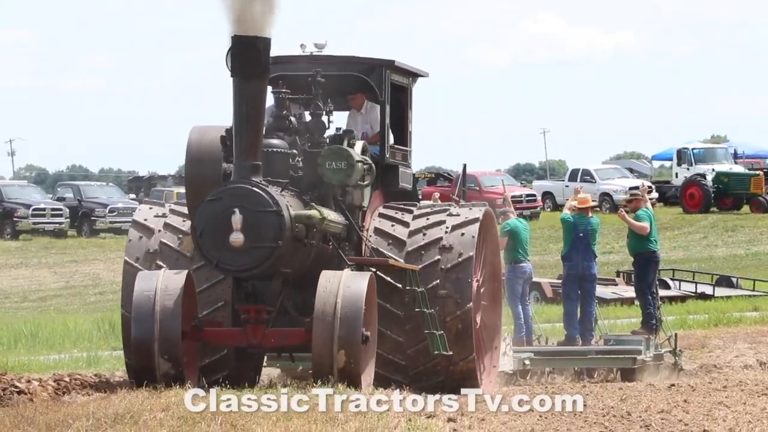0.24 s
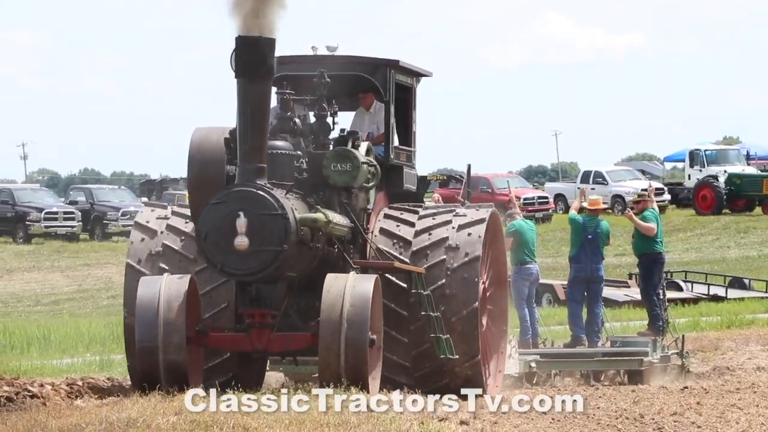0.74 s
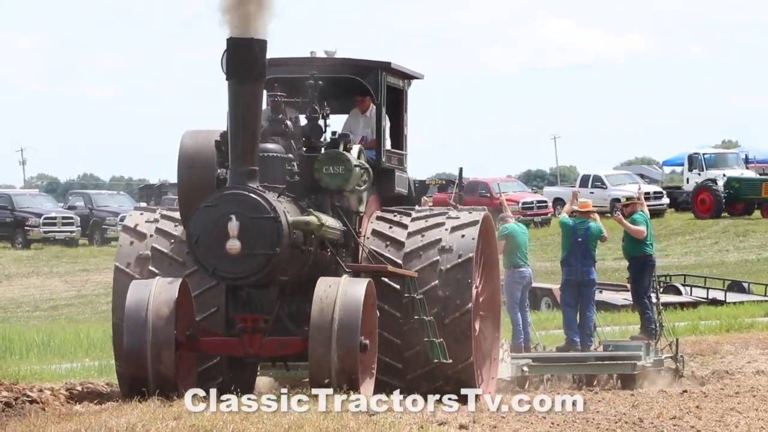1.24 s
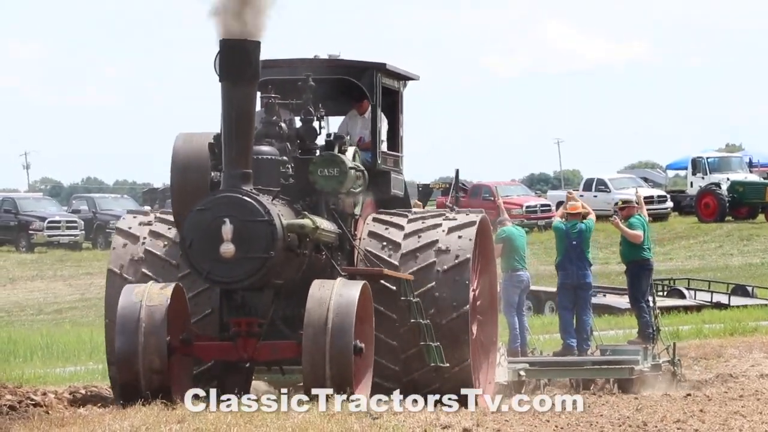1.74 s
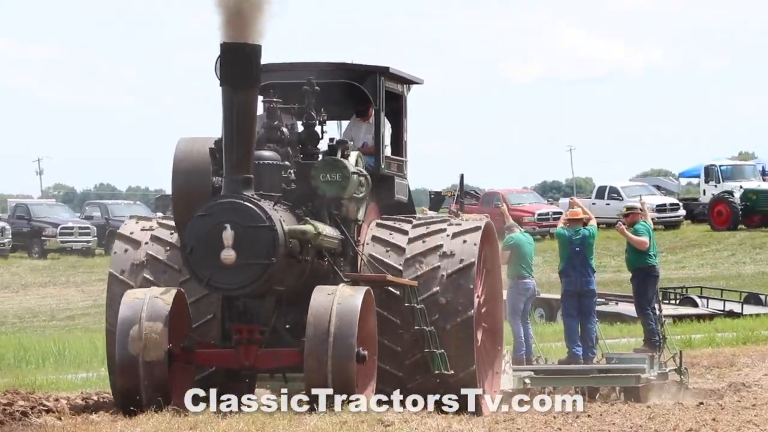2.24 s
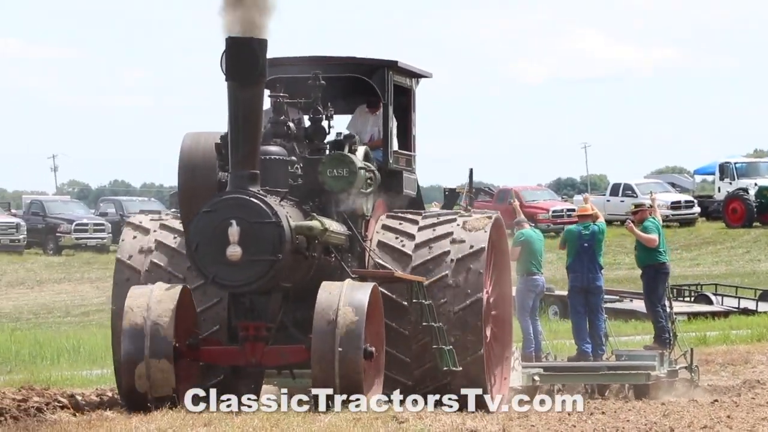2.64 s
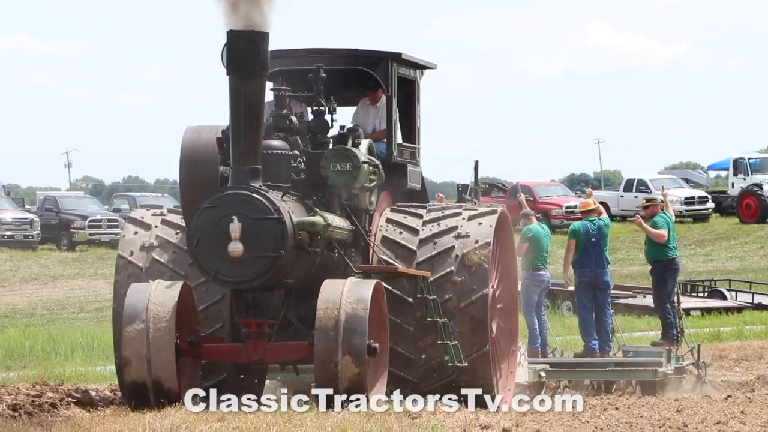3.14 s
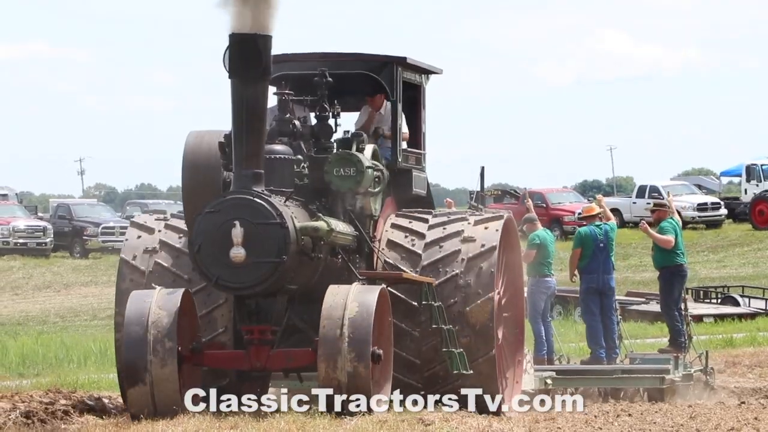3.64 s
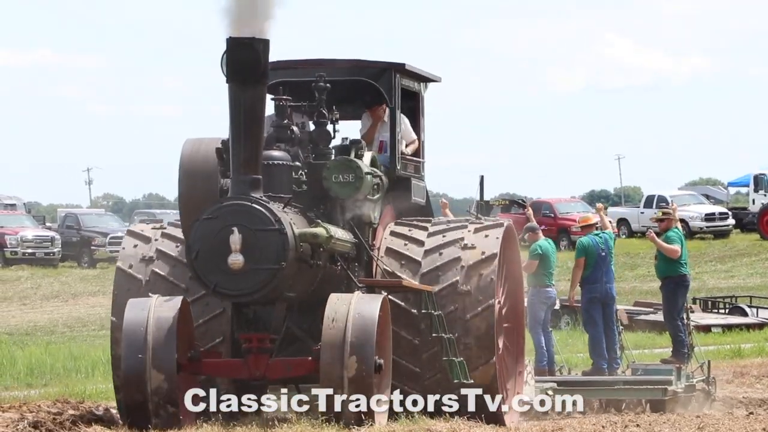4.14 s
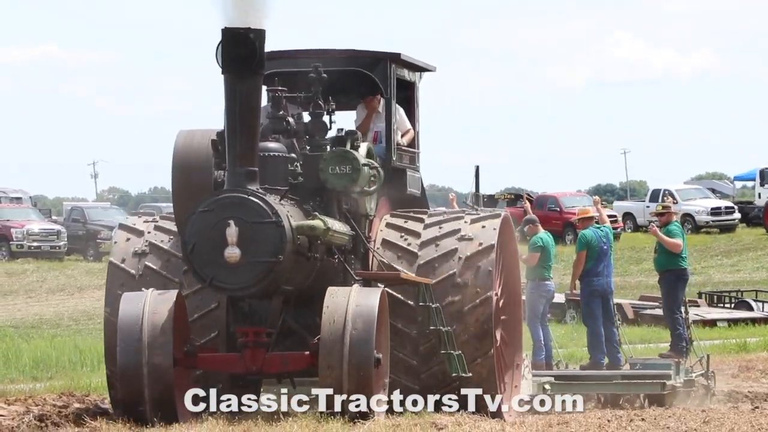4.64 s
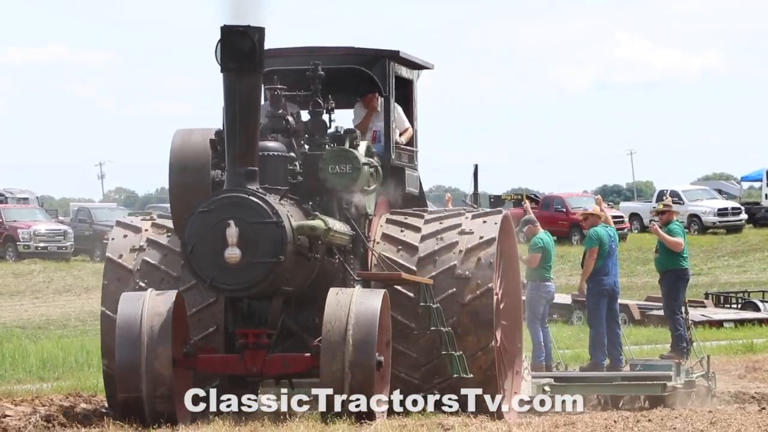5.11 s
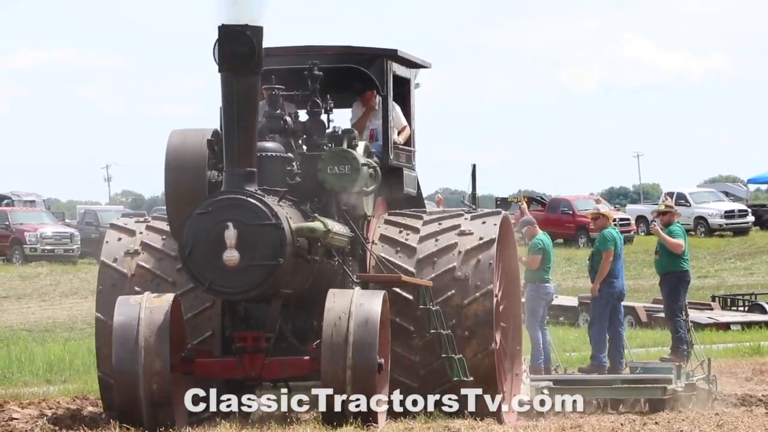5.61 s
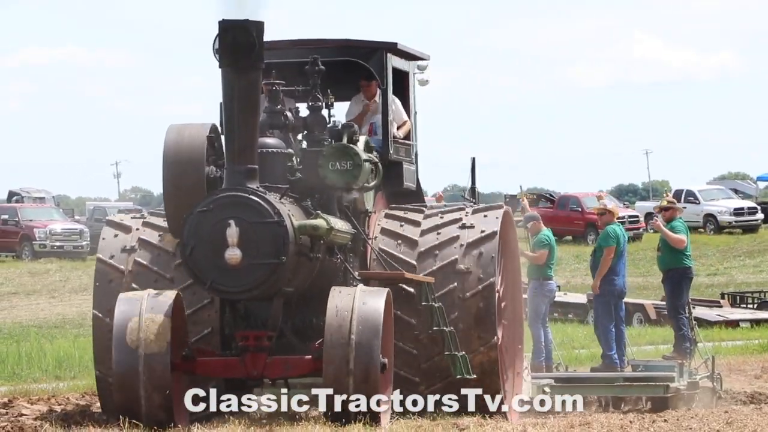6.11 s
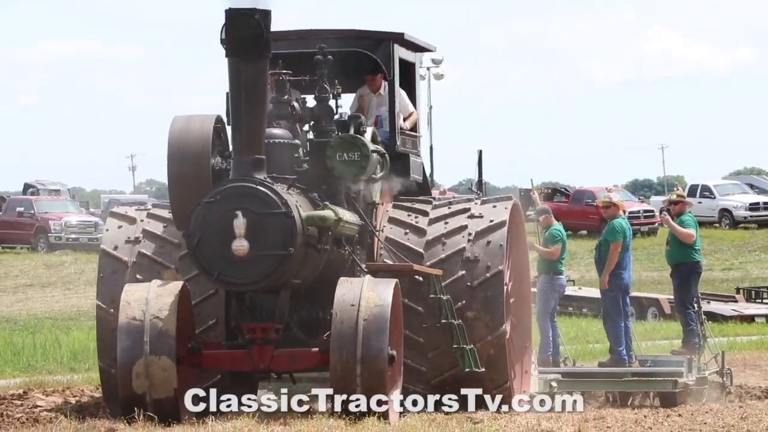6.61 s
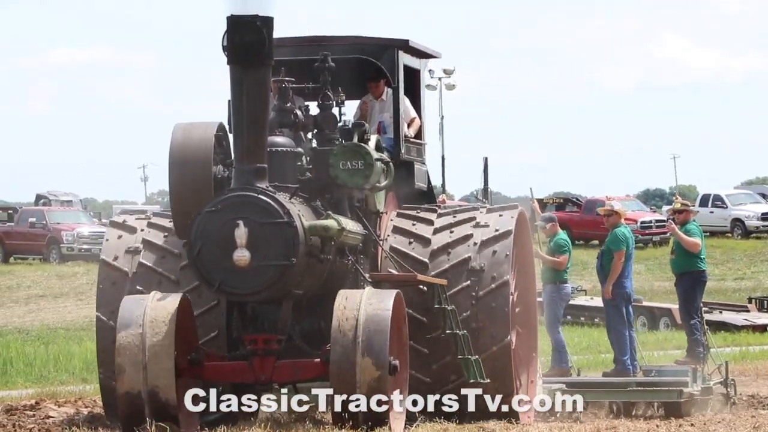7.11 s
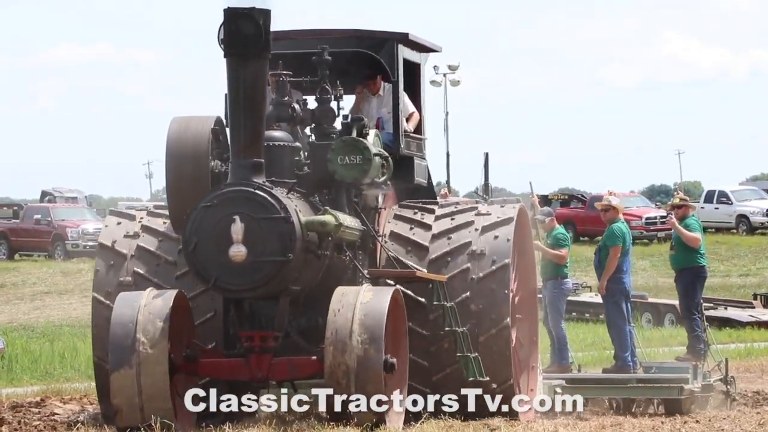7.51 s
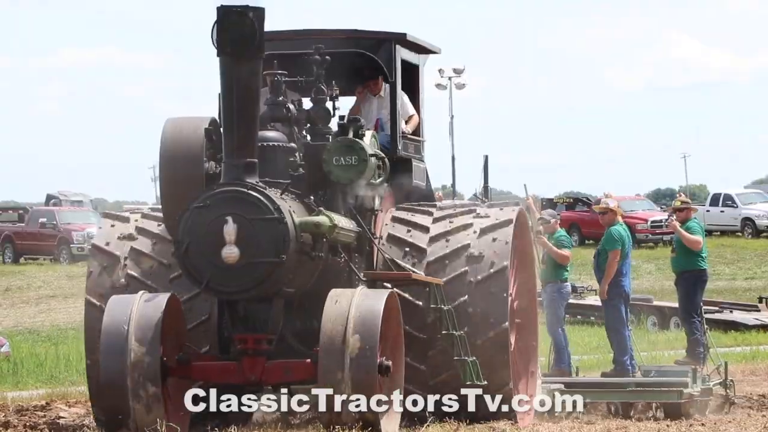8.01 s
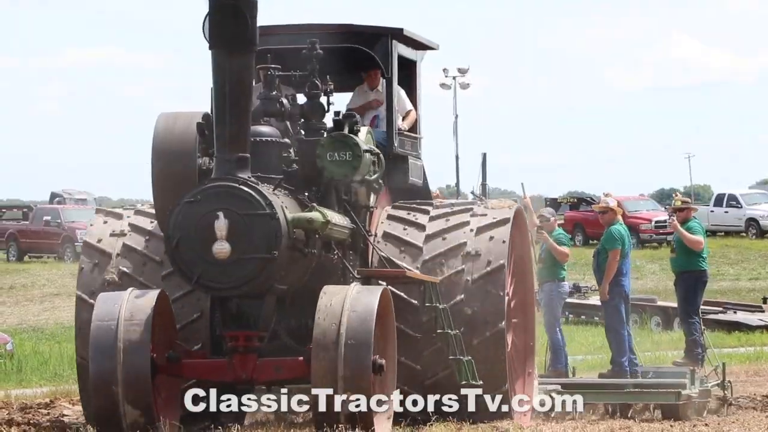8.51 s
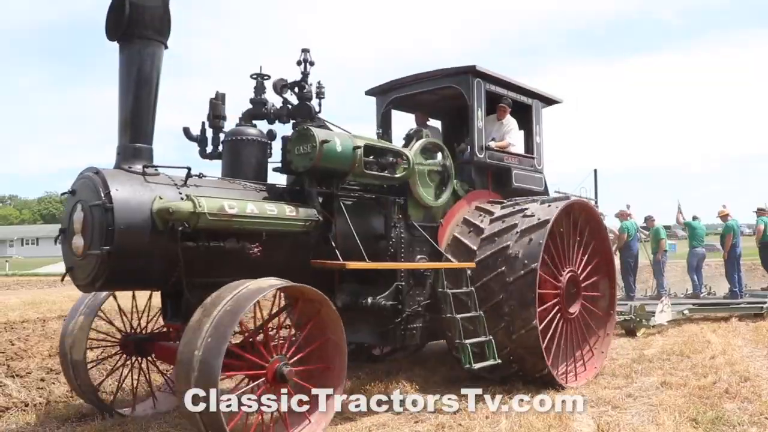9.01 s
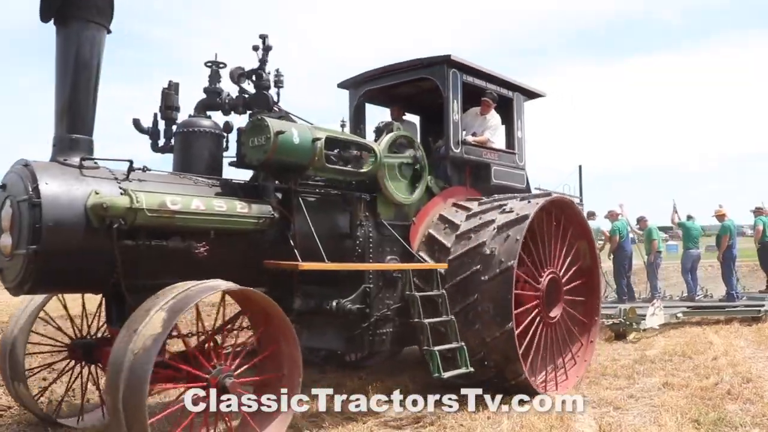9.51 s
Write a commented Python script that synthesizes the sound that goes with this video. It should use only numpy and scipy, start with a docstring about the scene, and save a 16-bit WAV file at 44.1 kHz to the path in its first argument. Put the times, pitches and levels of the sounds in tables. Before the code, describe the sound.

A heavy steam engine works in an open field, heard from ahead and fairly dry. Fast low chuffs with a rough bark and steamy tail run continuously, uneven in strength. Bright spurts from a valve to the right tick along in a separate, slower rhythm, briefly masking the rest. Gearing grinds and rings over a soft earth rumble. After over eight seconds it cuts to close by, without the spits, with stronger blasts and a piercing, airy steam whistle.

```python
"""A steam traction engine hauls a plow across an open field: about eight exhaust beats a second.
Each is a boom ringing the stack's air column, a ragged bark and rasp from the jet, and hissing steam.
To the right, bursts of noise spit steam at a pace of their own; coloured noise rumbles for wheels and plow,
grinds for the gearing and hisses for a leaking gland, whose whistle is a sine blurred by slow noise.
Near the end the listening place jumps from ahead of the engine to close beside it."""
import sys
import numpy as np
from scipy import signal
from scipy.fft import rfft, irfft, next_fast_len
from scipy.io import wavfile
from scipy.ndimage import map_coordinates

SR = 44100
rng = np.random.default_rng(int(sys.argv[2]) if len(sys.argv) > 2 else 0)


def master_out(mix):
    """Clip the mix to full scale and print it as 16-bit PCM to the path in sys.argv[1]."""
    frames = np.transpose(np.atleast_2d(mix))
    ceiling = np.clip(frames, -1, 1)
    pcm = np.round(ceiling * 32767).astype(np.int16)
    wavfile.write(sys.argv[1], SR, pcm)


N = 429975
MOVE_S = 8.624  # when the listening place jumps


def amp(db):
    """Decibels to gain."""
    return 10 ** (np.asarray(db) / 20)


def unit(x):
    """Scale to rms 1."""
    return x / np.sqrt(np.mean(x ** 2) + 1e-20)


def along(points, hz):
    """Interpolate (Hz, value) points on a log frequency axis."""
    f, v = np.transpose(points)
    return np.interp(np.log(hz + 1), np.log(f + 1), v)


def at(rows, times):
    """The value of each column after the time, at the given times."""
    s, *cols = np.transpose(rows)
    return [np.interp(times, s, c) for c in cols]


def wobble(rate, size=N):
    """A smooth random curve, rate knots a second."""
    knots = rng.standard_normal(int(size * rate / SR) + 4)
    return map_coordinates(knots, [np.arange(size) * rate / SR], mode="nearest")


def filtered(x, response):
    """Apply a complex response of frequency to x."""
    size = x.shape[-1]
    m = next_fast_len(size + 4096)
    spectrum = rfft(x, m) * response(np.fft.rfftfreq(m, 1 / SR))
    return irfft(spectrum, m)[..., :size]


def noise(spectrum, size=N):
    """Noise of rms 1 with a given colour."""
    white = rng.standard_normal(size)
    return unit(filtered(white, lambda hz: amp(along(spectrum, hz))))


def wide(spectrum):
    """Stereo noise with a share that differs between the ears."""
    # Each row: frequency in Hz, level of the differing share in dB.
    spread = [(30, -23), (70, -18), (170, -19.5), (400, -14.5), (1000, -6), (1500, -3), (2300, 3.5),
              (4000, -1), (9000, -3.5)]
    mid = noise(spectrum)
    side = filtered(noise(spectrum), lambda hz: amp(along(spread, hz)))
    return np.array([mid + side, mid - side])


def placed(x, right_db, right_lead_ms):
    """A source to one side differs between the ears in level and arrival time."""
    side = np.array([[-1], [1]]) / 2
    lead_s = side * right_lead_ms * 10 ** -3
    return filtered(x, lambda hz: amp(side * right_db) * np.exp(2j * np.pi * hz * lead_s))


def add(track, s, sound):
    """Mix a sound into a track from time s."""
    start = max(round(s * SR), 0)
    part = track[start:start + len(sound)]
    part += sound[:len(part)]


def beside():
    """0 while listening from ahead, 1 from beside the engine."""
    return (np.arange(N) / SR >= MOVE_S) * 1.


def beat_times():
    """One beat for each piston stroke, lagging a steady pace as the load changes."""
    # How far the crank lags. Each row: time in seconds, lag in seconds.
    crank_lag = [(0, 0.033), (1.0, 0.055), (2.35, .054), (2.8, 0.067), (3.35, 0.048), (4.05, 0.067),
                 (4.7, .044), (5.2, 0.062), (6.05, 0.044), (6.6, .059), (7.3, 0.042), (7.85, 0.062),
                 (8.59, .023), (9.6, .029)]
    stroke_s = .1263
    steady = np.arange(0, N / SR - stroke_s, stroke_s)
    return steady + at(crank_lag, steady)[0]


def spit_times():
    """One spit for each lift of the valve, limping at its own pace; heard only from ahead."""
    # Each row: time in seconds, lag in seconds, limp in seconds (alternate spits early and late).
    spit_lag = [(0, 0.14, 0.0021), (.7, .14, 0.00059), (1.0, 0.14, 0.0026), (2.05, .147, .004),
                (3.1, .1455, 0.0012), (4.2, .14, 0), (5.6, 0.14, 0.00075), (6.5, .137, 0.00075),
                (6.95, 0.14, 0.00071), (8.1, 0.15, 0.0009), (8.4, 0.15, 0)]
    spit_s = .18681
    steady = np.arange(0, MOVE_S - spit_s, spit_s)
    lag, limp = at(spit_lag, steady)
    return steady + lag - limp * (-1) ** np.arange(len(steady))


def dip():
    """Near 1 at the bottom of the brief level dip that follows each spit, 0 away from it."""
    bottom_s, fall_s, recovery_s = 0.026, 0.023, 0.033
    depth = np.zeros(N)
    t = np.arange(SR // 5) / SR - bottom_s
    shape = np.exp(-(t / np.where(t < 0, fall_s, recovery_s)) ** 2)
    for s in spit_times():
        add(depth, s, shape)
    return depth * (1 - beside())


def field(x):
    """The ground scatters a faint, short tail of decaying noise back, different for each ear."""
    scatter_db, t60_s = -22, 0.072
    t = np.arange(SR // 6) / SR
    tail = rng.standard_normal((2, len(t))) * amp(-60 * t / t60_s)
    scatter = signal.fftconvolve(x, tail / np.linalg.norm(tail[0]), axes=1)[:, :N]
    return x + amp(scatter_db) * scatter


def running():
    """Wheels and plow rumble through the soil, open gearing grinds and rings, the crank churns close by."""
    # Wheels and plow in the soil. Each row: frequency in Hz, relative level in dB.
    soil_colour = [(15, -22), (28, -37), (45, 0.5), (70, -5.5), (110, -2), (170, -10.5), (260, -7.5),
                   (450, -20), (800, -26), (2000, -63)]
    # Grinding teeth. Each row: frequency in Hz, relative level in dB.
    gearing_colour = [(400, -3.5), (750, -15), (1100, -2), (1240, 0.5), (1360, -5.5), (1560, 1.5),
                      (1750, -6), (2300, -8), (3300, -11.5), (5000, -20.5), (8500, -20), (12000, -51),
                      (16000, -64)]
    # Hollow ring of the big gear wheels. Each row: frequency in Hz, relative level in dB.
    ring_colour = [(1100, -37), (1190, -17), (1230, 7), (1275, -3), (1380, 0.5), (1470, -7), (1560, -10.5),
                   (1700, -34)]
    # Crank and crosshead from beside. Each row: frequency in Hz, relative level in dB.
    crank_colour = [(120, -26), (230, -3), (320, 6), (400, -4), (600, 6.5), (720, -6), (1000, -5),
                    (1350, -11), (1700, -9), (4000, -29)]
    rumble_start_db, rumble_fall_db_per_s = -33.5, 0.62
    gearing_ahead_db, gearing_beside_db = -33, -37.5
    rumble_dip_db, gearing_dip_db = 2.5, 4.5

    approach = np.arange(N) / N  # 0 at the start, 1 at the end
    rumble_db = rumble_start_db - rumble_fall_db_per_s * np.arange(N) / SR + 1.5 * wobble(10)
    rumble = amp(rumble_db - rumble_dip_db * dip()) * wide(soil_colour)
    grit = amp(2.42 * wobble(35) + 1.74 * wobble(260))  # teeth catch and scrape unevenly
    gearing_db = np.where(beside() > 0, gearing_beside_db, gearing_ahead_db)
    gearing = amp(gearing_db) * grit * wide(gearing_colour)
    gearing = gearing * amp([[-1.5], [1.5]])  # leans to the right
    ring = amp(-44.5 + 11.2 * approach + 1.9 * wobble(3.0)) * noise(ring_colour)
    gears = amp(-gearing_dip_db * dip()) * (gearing + ring)
    crank = amp(-34.0) * beside() * wide(crank_colour)
    return rumble + gears + crank


def gland():
    """Leaking steam whistles, sagging in pitch as pressure falls after each beat; from beside it also hisses."""
    # Escaping steam. Each row: frequency in Hz, relative level in dB.
    leak_colour = [(1500, -20), (4000, -16), (7000, 4.5), (9000, 15), (11000, -3), (13000, -15),
                   (15000, -17), (16000, -26)]
    # The whistle's rise and fall. Each row: time in seconds, level in dB before pressure and flicker.
    whistle_level = [(0, -65), (3.1, -60), (3.4, -50), (4.3, -57), (4.9, -52), (8.6, -54), (8.66, -35),
                     (8.95, -40.5), (9.75, -44)]
    ahead_hz, ahead_swing_hz = 8480, 120.6
    beside_hz, beside_swing_hz = 8800, 443
    pressure_peak = .09  # share of a stroke after the beat

    t, beats = np.arange(N) / SR, beat_times()
    stroke = np.interp(t, np.append(beats, N / SR), np.arange(len(beats) + 1))
    pressure = np.cos(2 * np.pi * (stroke - pressure_peak))
    pitch_ahead = ahead_hz + ahead_swing_hz * pressure
    pitch_beside = beside_hz + beside_swing_hz * pressure
    pitch_hz = np.where(beside() > 0, pitch_beside, pitch_ahead) + 80 * wobble(14)
    airy = noise([(10, 0), (90, -1), (250, -13), (800, -32), (3000, -80)])  # blurs the sine to a breath
    tone = unit(airy * np.sin(2 * np.pi * np.cumsum(pitch_hz) / SR))
    flicker_db = 2.5 * wobble(25) + 2 * wobble(5)
    whistle = amp(at(whistle_level, t)[0] - 3.0 * pressure + flicker_db) * tone
    leak = amp(-39.5) * beside() * wide(leak_colour)
    return whistle + leak


def spits():
    """Some five times a second a valve seeps, snaps open briefly and shuts; the treble stops first."""
    # Body of the vent. Each row: frequency in Hz, relative level in dB.
    body_colour = [(500, -18.5), (780, -23), (950, -2.5), (1120, -2.5), (1330, 3.5), (1600, 0.5),
                   (1900, -0.5), (2150, -1), (2350, -12.5), (3500, -43)]
    # Its rasp. Each row: frequency in Hz, relative level in dB.
    rasp_colour = [(2300, -9.5), (2650, 4.5), (3100, 8.5), (3900, 0.5), (4600, -3.5), (5500, -44)]
    # Its hiss. Each row: frequency in Hz, relative level in dB.
    hiss_colour = [(4300, -22), (5000, 2.5), (5700, 7.5), (6600, 6), (8000, 4.5), (10000, -3), (13000, -11),
                   (16000, -41)]
    # Balance of the spits. Each row: time in seconds, body level in dB, rasp level in dB, hiss level in dB.
    spit_level = [(.14, -25, -24.5, -24), (.55, -21, -22.5, -26.5), (2.4, -24, -24, -22.5),
                  (4.25, -22.5, -24.5, -27.5), (4.6, -21, -32, -29.5), (5.18, -21.5, -24, -26),
                  (5.7, -23, -30, -30), (6.48, -22.5, -28, -26.5), (6.68, -23, -22, -22),
                  (6.87, -22, -29, -24), (7.43, -22.5, -25, -25.5), (7.8, -22.5, -30, -32),
                  (8.56, -25, -26.5, -29)]

    body, rasp, hiss = np.zeros((3, N))
    size = SR // 4
    t = (np.arange(size) - size / 2) / SR
    snap = (1 + np.tanh((t + .008) / .0032)) / 2
    seep = np.exp(-((t + 0.0063) / 0.062) ** 2) * (1 - snap)

    def flow(width, seep_db):
        """Seeping before the snap, then a bell-shaped burst of the given width in seconds."""
        return snap * np.exp(-(t / width) ** 2) + amp(seep_db) * seep

    body_flow = flow(width=0.018, seep_db=-13.5)
    rasp_flow = flow(width=0.014, seep_db=-18.0)
    hiss_flow = flow(width=0.013, seep_db=-25.5)
    for s in spit_times():
        body_db, rasp_db, hiss_db = at(spit_level, s)
        sputter = amp(1.2 * wobble(330, size=size))
        start = s + t[0]
        add(body, start, amp(body_db) * body_flow * sputter * noise(body_colour, size=size))
        add(rasp, start, amp(rasp_db) * rasp_flow * sputter * noise(rasp_colour, size=size))
        add(hiss, start, amp(hiss_db) * hiss_flow * sputter * noise(hiss_colour, size=size))
    body = placed(body, right_db=6.8, right_lead_ms=.13)
    rasp = placed(rasp, right_db=11, right_lead_ms=.12)
    hiss = placed(hiss, right_db=8, right_lead_ms=.105)
    return body + rasp + hiss


def blast(t, opening, hold, fall_db):
    """The valve opens, the cylinder blows down; after hold seconds the flow dies by fall_db a second."""
    return (1 - np.exp(-(t / opening) ** 2)) * amp(-fall_db * np.maximum(t - hold, 0))


def stack(flow, modes, note_hz, note_db):
    """Turbulence rings the stack's air column, which also hoots a note and its octave while the jet blows."""
    octave_db, wander_hz = -11, 14.95

    def pipe(f):
        """Resonances of alternating sign, one for each mode."""
        total = 0
        for k, (centre, width, db) in enumerate(modes):
            damping = 1j * f * width
            total = total + (-1) ** k * amp(db) * damping / (centre * centre - f * f + damping)
        return total

    turbulence = flow * rng.standard_normal(len(flow))
    ring = filtered(turbulence, lambda f: pipe(f) / (1 + 1j * f / 900) ** 2)  # dulled above 900 Hz
    pitch_hz = note_hz + wander_hz * wobble(60.5, size=len(flow))
    phase = 2 * np.pi * np.cumsum(pitch_hz) / SR
    late_flow = np.roll(flow, SR // 180)  # the hoot speaks a moment later
    hoot = late_flow * (np.sin(phase) + amp(octave_db) * np.sin(2 * phase))
    return unit(unit(ring) + amp(note_db) * unit(hoot)) * np.sqrt(np.mean(flow ** 2))


def exhaust():
    """Each stroke releases a blast: a boom from the stack, a ragged bark and rasp from the jet, then hiss."""
    # Air column of the stack. Each row: frequency in Hz, width in Hz, relative level in dB.
    stack_ahead = [(167, 41.7, 2.5), (202.5, 64.5, -0.5), (403, 80, -8), (500, 295, -19.5)]
    stack_beside = [(204, 85, 5), (226, 39.3, -22), (373.4, 17, 6), (580, 210, -4)]
    # Jet leaving the blast nozzle. Each row: frequency in Hz, relative level in dB.
    bark_ahead = [(250, -6), (450, -8), (720, -9.5), (950, -5), (1220, 3.5), (1500, 0.5), (1800, -3),
                  (2400, -14), (3400, -14), (5000, -55)]
    bark_beside = [(250, -12), (500, 3), (720, 1), (1000, 3.5), (1120, 3.5), (1240, 5), (1450, 5),
                   (1650, -2), (1950, 2), (2300, -4.5), (3400, -7.5), (5000, -23)]
    # Rasp of the jet, far off and near. Each row: frequency in Hz, relative level in dB.
    rasp_far = [(1800, -9), (2400, 4.5), (2900, -4), (3700, -3.5), (4600, -4), (6000, -31)]
    rasp_near = [(1800, -29), (2500, -9), (3350, 3), (4100, 3), (4800, -15), (6000, -33)]
    # Steam escaping above the stack. Each row: frequency in Hz, relative level in dB.
    hiss_colour = [(3500, -14), (4800, -2), (6300, 2), (8500, 0.5), (10500, -3), (13000, -9.5),
                   (15000, -20), (16000, -29)]
    # Steam the governor admits to the cylinder. Each row: time in seconds, effort in dB.
    effort = [(0.03, -2.5), (0.28, -3.4), (0.42, -1), (0.68, 1), (0.93, 0.5), (1.08, -4), (1.19, 0.5),
              (1.95, 4), (2.08, -1.5), (2.97, 7), (3.09, 1.3), (3.46, -3.5), (3.72, 1.5), (3.85, 1),
              (4.11, 5.5), (4.24, 4.5), (4.35, 3.4), (4.61, -1.5), (5.37, 5.5), (5.86, -3.6), (6.88, 6),
              (7.26, -5), (8.02, 6), (8.49, -1)]
    # Drift of the beats' colour from ahead, at 0 dB effort.
    # Each row: time in seconds, boom level in dB, bark level in dB, hiss level in dB.
    beat_colour = [(0, -26, -29.5, -32), (1.7, -25, -27, -37.5), (2.4, -26.5, -28.5, -34.5),
                   (2.9, -27.5, -27.5, -31), (3.6, -26, -27.5, -34.5), (4.35, -24.5, -26.5, -36.5),
                   (5.1, -29, -25.5, -32.5), (5.65, -22.5, -25, -29.5), (6.2, -25.5, -27, -35.5),
                   (6.62, -28, -26, -35.5), (6.8, -25, -25.5, -35), (7.3, -26.5, -28, -31),
                   (7.65, -27, -27.5, -36), (8.1, -25.5, -29, -31.5), (8.5, -24.5, -27.5, -38)]
    rasp_ahead_db = -32
    boom_beside_db, bark_beside_db, rasp_beside_db, hiss_beside_db = -22, -22.3, -30, -24.5
    # dB gained for one dB of effort: rasp and hiss gain most, so hard beats are brighter
    boom_grows, bark_grows, rasp_grows, hiss_grows = 0.79, 0.65, 1, 1.13
    uneven_db, boom_scatter_db = 0.77, 1.1  # unequal cylinder ends, random booms
    dip_db = 5.5

    ahead, close = np.zeros(N), np.zeros(N)
    size = SR // 3
    t = np.arange(size) / SR
    burst = np.maximum(t - .005, 0)  # the jet clears the stack's mouth a moment later
    for stroke, s in enumerate(beat_times()):
        effort_db = at(effort, s)[0] + uneven_db * (-1) ** stroke
        boom_gain = amp(boom_grows * effort_db + boom_scatter_db * rng.standard_normal())
        bark_gain = amp(bark_grows * effort_db)
        ragged = amp(0.8 * wobble(216, size=size))
        near = np.clip(s / MOVE_S, 0, 1) ** 2
        jet = np.sqrt(1 - near) * noise(rasp_far, size=size) + np.sqrt(near) * noise(rasp_near, size=size)
        rasp = amp(rasp_grows * effort_db) * blast(burst, opening=0.012, hold=0.021, fall_db=172) * jet
        steam = blast(t, opening=.016, hold=.029, fall_db=155) * noise(hiss_colour, size=size)
        hiss = amp(hiss_grows * effort_db) * steam
        if s < MOVE_S - .05:
            boom_db, bark_db, hiss_db = at(beat_colour, s)
            boom_flow = blast(t, opening=0.013, hold=0.028, fall_db=130)
            boom = amp(boom_db) * boom_gain * stack(boom_flow, stack_ahead, note_hz=192.6, note_db=-4.5)
            bark_flow = blast(burst, opening=0.0056, hold=0.031, fall_db=133)
            bark = amp(bark_db) * bark_gain * bark_flow * noise(bark_ahead, size=size)
            add(ahead, s, boom + ragged * (bark + amp(rasp_ahead_db) * rasp) + amp(hiss_db) * hiss)
        else:
            boom_flow = blast(t, opening=0.0073, hold=0.035, fall_db=121)
            boom = stack(boom_flow, stack_beside, note_hz=201.0, note_db=-7.0)
            boom = amp(boom_beside_db) * boom_gain * boom
            bark_flow = blast(burst, opening=0.0049, hold=0.014, fall_db=136)
            bark = amp(bark_beside_db) * bark_gain * bark_flow * noise(bark_beside, size=size)
            add(close, s, boom + ragged * (bark + amp(rasp_beside_db) * rasp) + amp(hiss_beside_db) * hiss)
    ahead = amp(-dip_db * dip()) * placed(ahead, right_db=0.46, right_lead_ms=0)
    close = placed(close, right_db=-0.5, right_lead_ms=-0.063)
    return ahead * (1 - beside()) + close * beside()


def scene():
    """Exhaust and spits in the open, over the running gear and the leak."""
    return field(exhaust()) + spits() + running() + gland()


def record(dry):
    """Cut everything above the band limit."""
    top_hz = 15780
    return filtered(dry, lambda hz: hz < top_hz)


dry = scene()
out = record(dry)
master_out(out)
```